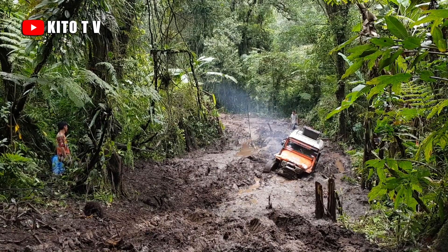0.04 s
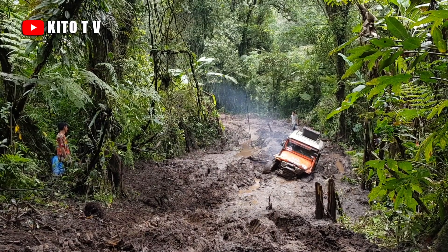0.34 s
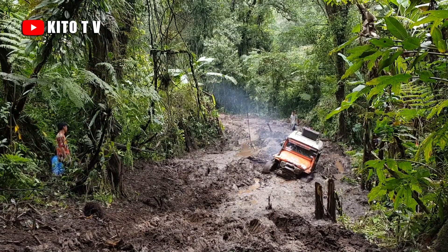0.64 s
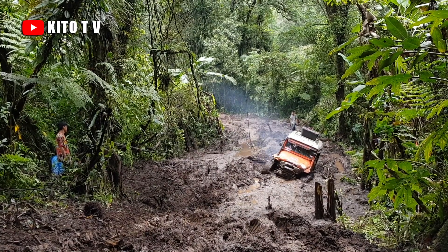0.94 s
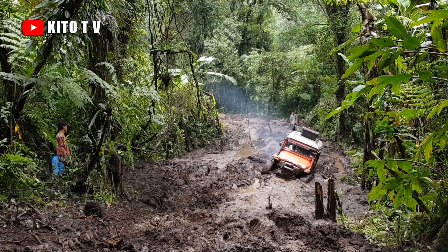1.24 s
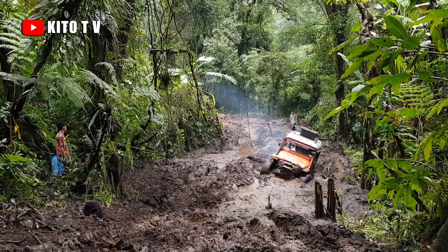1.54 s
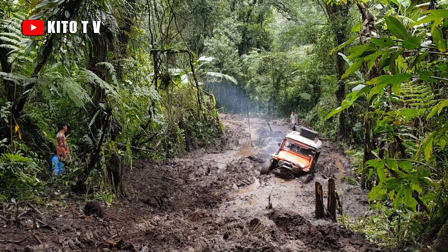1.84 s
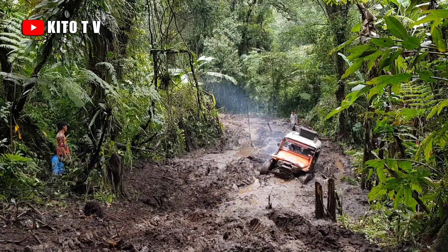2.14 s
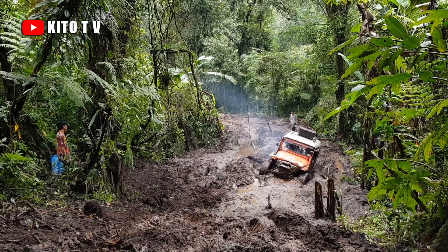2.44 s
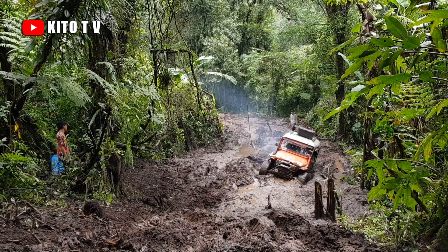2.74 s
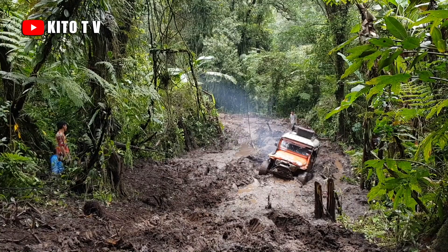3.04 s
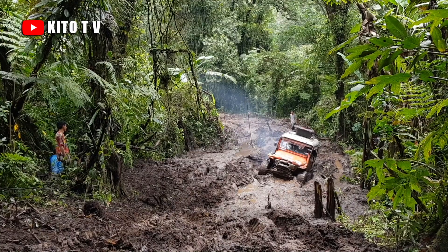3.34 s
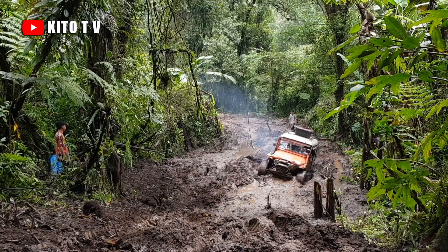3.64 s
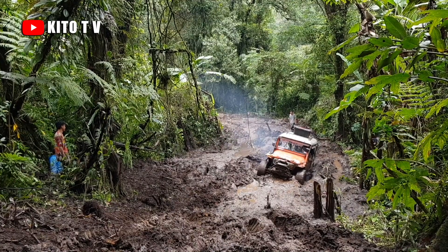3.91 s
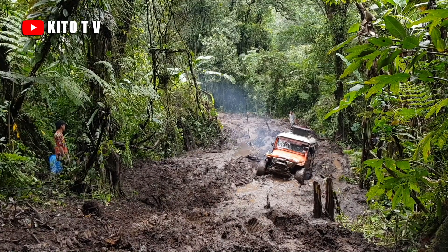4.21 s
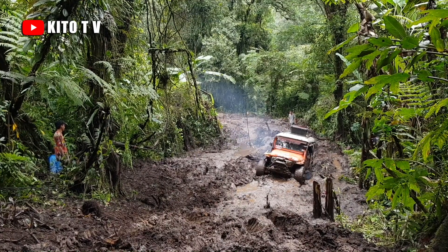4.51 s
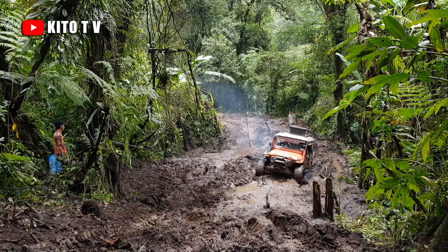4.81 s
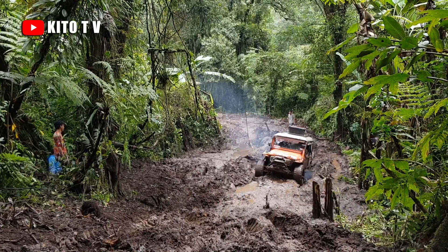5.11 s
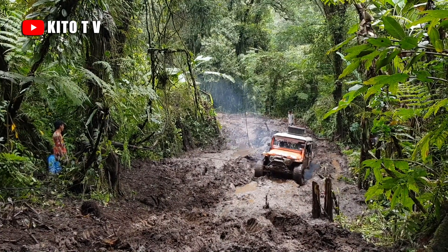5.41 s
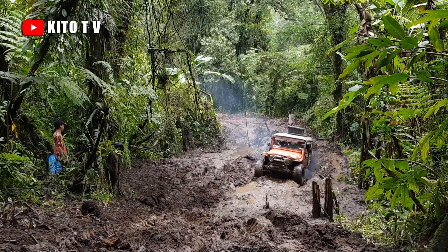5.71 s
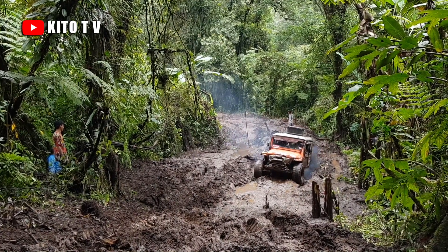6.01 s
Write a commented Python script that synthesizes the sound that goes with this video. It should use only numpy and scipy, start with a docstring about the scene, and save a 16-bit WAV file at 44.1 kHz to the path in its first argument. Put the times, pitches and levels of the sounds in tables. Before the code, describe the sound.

A four-cylinder diesel four-wheel-drive climbs a muddy forest track about twenty metres away. For the first second or so the engine holds high revs, with a whirr of fan and gears above a low exhaust drone. Wet mud spatters faintly throughout. From about 2 seconds the revs sag under load, the whirr fades and the exhaust booms and throbs, slowing to its lowest pitch around 4.5 seconds. From about 3.4 seconds loose body panels buzz in short bursts, growing stronger toward the end. From 4.4 seconds the chassis gives irregular, sharp metal clunks and clinks. Near 5 seconds the throttle opens and the revs climb again, with hard diesel knocking and a light rush of air, still pulling at just past 6 seconds. The trees scatter the sound and add a short reverberant tail.

```python
"""A four-cylinder diesel four-wheel-drive climbs a muddy forest track, some twenty metres off.
At first fan and timing gear whirr at high revs, wet mud spatters, and the trees scatter the engine's sound.
From about 2 s the tyres dig in: the revs sag and the exhaust booms on the standing waves of its pipe.
After 3 s loose bodywork buzzes, driven by the firings; from 4.4 s the chassis clunks in the ruts.
Near 5 s the throttle opens and the engine pulls through with hard combustion knock."""
import sys
import numpy as np
from scipy import signal
from scipy.fft import rfft, irfft
from scipy.io import wavfile

SR = 44100
rng = np.random.default_rng(int(sys.argv[2]) if len(sys.argv) > 2 else 0)


def transcribe(u):
    """Save the signal u as a 16-bit wav file named by the first command-line argument.

    u: samples, shape (n,) or (channels, n), limited to [-1, 1]; the rate is SR.
    q: integer samples, one column per channel.
    """
    v = np.clip(np.atleast_2d(u).T, -1, 1)
    q = np.round(v * 32767).astype(np.int16)
    wavfile.write(sys.argv[1], SR, q)


N = 275788
T = np.arange(N) / SR
FREQS = np.maximum(np.fft.rfftfreq(N, 1 / SR), 1)
CYLINDERS = 4

def undb(db):
    """Amplitude ratio of a level in decibels."""
    return 10 ** (np.asarray(db) / 20)

def unit(x):
    """Normalisation to rms 1."""
    return x / np.sqrt(np.mean(x ** 2))

def curves(rows):
    """Linear interpolation of each column in time."""
    s, *columns = np.transpose(rows)
    return [np.interp(T, s, c) for c in columns]

def spectra(rows):
    """Linear interpolation of each column in log frequency."""
    hz, *columns = np.transpose(rows)
    return [np.interp(np.log(FREQS), np.log(hz), c) for c in columns]

def lifts(modes):
    """Resonance: a bell-shaped gain in dB for each mode."""
    return sum(db / (1 + (2 * (FREQS - hz) / width) ** 2) for hz, width, db in modes)

def shape(x, gain):
    """Linear filtering by a frequency response."""
    return irfft(rfft(x) * gain, N)

def walk(rate_hz):
    """Random modulation: low-pass noise of rms 1."""
    return unit(shape(rng.standard_normal(N), np.exp(-(FREQS / rate_hz) ** 2)))

def hum(hz, width_hz):
    """Quadrature modulation: narrow-band noise about a moving frequency."""
    phase = 2 * np.pi * np.cumsum(hz) / SR
    return (walk(width_hz) * np.cos(phase) + walk(width_hz) * np.sin(phase)) / np.sqrt(2)

def place(x, pan_db):
    """Interaural level difference, left minus right."""
    return x * undb(np.array([[pan_db], [-pan_db]]) / 2)

# engine speed (time [s], firing rate [Hz])
FIRING_RATE = [(0.0, 78.74), (0.6, 78.35), (0.85, 77.59), (1.3, 78.74), (2.2, 71.58), (2.4, 69.21),
               (3.05, 63.05), (4.25, 49.83), (4.6, 48.99), (5.05, 50.79), (5.5, 54.9), (6.25, 67.64)]
# engine effort (time [s], load [0-1])
ENGINE_LOAD = [(0, 0.2), (1.2, 0.24), (1.8, 0.57), (2.3, 0.65), (2.7, 0.8), (3.3, 1), (4.7, 0.91),
               (5.6, 0.99), (6.25, 0.66)]
def crankshaft():
    """Phase is the integral of frequency: the jittered rate accumulates to a firing count."""
    hz, = curves(FIRING_RATE)
    load, = curves(ENGINE_LOAD)
    firings = np.cumsum(hz * (1 + .002 * walk(15))) / SR
    return hz, firings, load

# exhaust pipe modes (frequency [Hz], bandwidth [Hz], gain [dB])
PIPE_MODES = [(112.4, 25.4, 19.5), (185.6, 14.7, 13.5), (236.4, 28, 20), (367, 28, -49), (540, 67, -47.5)]
def pipe(hz):
    """Modal superposition gives the exhaust pipe's complex response."""
    return sum(undb(db) / (1 + 1j * (hz / f - f / hz) * f / width) for f, width, db in PIPE_MODES)

# peaks and dips of the exhaust (frequency [Hz], level [dB])
STANDING_WAVES = [(51, -23), (66, -27.5), (78, -27), (104, -10), (121, -11), (148, -16), (161, -29),
                  (171, -16.5), (198, -19.5), (209, -30), (223, -22.5), (270, -26), (292, -38), (325, -41),
                  (348, -46.5), (385, -41.5), (546, -56)]
# exhaust timbre (time [s], second harmonic gain [dB], higher harmonic gain [dB])
TIMBRE = [(0.0, 4, 0.7), (1.2, -5.5, -0.5), (1.9, 2, -1.8), (2.25, -0.1, 2), (2.65, 1.9, 5), (3.3, -1, 4),
          (4.1, 1.4, -1.2), (4.6, 1.2, -3.5), (5.3, 1, 0.9), (5.85, 2, -2.9), (6.25, -2.5, -1.4)]
def partial(k, hz, firings, gain_db):
    """Standing waves: a tone at k times the firing rate swells and dips as it slides across them."""
    second_db, overtone_db = curves(TIMBRE)
    wave_hz, wave_db = np.transpose(STANDING_WAVES)
    boom_db = np.interp(np.log(k * hz), np.log(wave_hz), wave_db)
    colour_db = second_db * max(1 - abs(k - 2), 0) + overtone_db * np.clip(k - 2, 0, 1)
    phase = 2 * np.pi * k * firings + np.angle(pipe(k * hz)) - k * np.pi / 2
    return undb(gain_db + boom_db + colour_db) * np.cos(phase)

def exhaust(hz, firings, load):
    """Periodic pulses form a harmonic series; the engine stumbles when light and steadies under load."""
    flutter_db = .3 + (1 - load)
    return sum(partial(k, hz, firings, flutter_db * np.sqrt(k / 2) * walk(10)) for k in range(1, 9))

# lines 1/4, 1/2 and 3/4 of the way between harmonics, at 216 Hz (unloaded gain [dB], loaded gain [dB])
INTERHARMONICS = [(-12.5, -10.5), (-19.5, -14.5), (-22, -11.5)]
def lope(hz, firings, load, flutter_db=1.5):
    """Unequal cylinders repeat every fourth firing, so weaker lines lie between the harmonics."""
    db_per_octave = 9.5 - 6.5 * load
    out = np.zeros(N)
    for k in range(1, 7):
        for step, (light_db, loaded_db) in enumerate(INTERHARMONICS, 1):
            multiple = k + step / CYLINDERS
            # unequal manifold branches shift the pulses, inverting the line just under each harmonic
            sign = -1 if step == len(INTERHARMONICS) else 1
            db = light_db + load * (loaded_db - light_db) + db_per_octave * np.log2(multiple * hz / 216)
            out += sign * partial(multiple, hz, firings, db + flutter_db * walk(10))
    return out

def gas(hz, firings, load):
    """Turbulence: a puff follows each firing down the pipe, stronger with load and speed."""
    puffs = rng.standard_normal(N) * np.exp(-(firings % 1) / .35)
    flow = undb(-39 + 6 * load) * (hz / hz.mean()) ** 2.5
    return unit(shape(puffs, pipe(FREQS) / (1 + (45 / FREQS) ** 4))) * flow

def bank(x, delay_s=.02085, db=-21):
    """Reflection: a mud bank returns the boom from the side."""
    return undb(db) * np.interp(T - delay_s, T, x, left=0) * np.array([[1], [-1]])

# strength of each cylinder in firing order (level [dB])
BLOW_DB = [-5.5, -10.5, -6.5, -3.5]
def blows(firings, hz, decay_s, scatter_db, rest, rise_s=.0012):
    """Impact and exponential decay: an envelope of one uneven blow per firing, above a steady floor."""
    count = np.maximum(firings, 0).astype(int)
    age = firings % 1 / hz
    size_db = np.array(BLOW_DB)[count % CYLINDERS] + scatter_db * rng.uniform(-1, 1, size=1000)[count]
    return rest + undb(size_db) * np.exp(-age / decay_s) * (1 - np.exp(-age / rise_s))

def clatter(firings, repeat, points=3300):
    """Cyclostationary noise, two rows: a share of the power repeats with every four-stroke cycle."""
    position = firings / CYLINDERS % 1 * points
    patterns = rng.standard_normal((2, points))
    periodic = np.array([unit(np.interp(position, np.arange(points), row)) for row in patterns])
    return np.sqrt(repeat) * periodic + np.sqrt(1 - repeat) * rng.standard_normal((2, N))

# stereo image (frequency [Hz], coherence [0-1], left minus right [dB])
STEREO_IMAGE = [(200, 1, 6), (400, 0.34, -2), (690, 0.71, -1), (1270, 0.41, -5), (2210, 1, -7.5),
                (3100, 0.86, 0.5), (4300, 0, -6), (6600, 0.13, -10.5), (8600, 0.1, -0.5), (15000, 0.2, -3)]
def radiate(pair, colour_db, lag_s=64e-6, low_hz=60):
    """Scattering by foliage lowers the treble's coherence between the ears; the result has rms 1."""
    coherence, pan_db = spectra(STEREO_IMAGE)
    low_cut = 1 / (1 + (low_hz / FREQS) ** 2)
    mid, side = rfft(pair) * undb(colour_db) * low_cut * np.sqrt([1 + coherence, 1 - coherence])
    left = (mid + side) * undb(pan_db / 2) * np.exp(-2j * np.pi * FREQS * lag_s)
    right = (mid - side) * undb(-pan_db / 2)
    return unit(irfft([left, right], N))

# fan and timing gear noise (frequency [Hz], relative level [dB])
WHIRR_SPECTRUM = [(200, 9.5), (350, -6.5), (600, -4.5), (1100, -3.5), (1450, -7.5), (1720, -10.5),
                  (2100, 0.5), (2500, -10), (3100, -9.5), (4200, -12), (6000, -16.5), (8000, -26),
                  (12000, -18.5), (15500, -31)]
# panel modes (frequency [Hz], bandwidth [Hz], gain [dB])
PANEL_MODES = [(1420, 45, 10.5), (1474, 42, 7), (1970, 130, 1), (2390, 46, 2.5), (2710, 97, 6.5)]
def whirr(hz, firings, load):
    """Rotational noise of fan and gears, pulsed by the valves, falls steeply as the revs sag."""
    valves = blows(2 * firings, 2 * hz, decay_s=.0018, scatter_db=2, rest=.93)
    colour_db = spectra(WHIRR_SPECTRUM)[0] + lifts(PANEL_MODES)
    db = -29 + 23.5 * np.log2(hz / hz.max()) + 1.5 * load + .24 * walk(3.4)
    return undb(db) * radiate(valves * clatter(firings, repeat=.6), colour_db)

# timing gear tones (frequency [multiples of the firing rate], level at top speed [dB])
MESH_TONES = [(16, -45.5), (17, -52), (18.6, -45), (20, -46), (27, -49), (29.15, -43), (32, -48.5)]
def gears(hz):
    """Tooth meshing: whines keep step with the crankshaft and fade as it slows."""
    whine = sum(undb(db) * hum(multiple * hz, width_hz=25) for multiple, db in MESH_TONES)
    return place(whine * (hz / hz.max()) ** 1.8, pan_db=-6.5)

# engine block modes (frequency [Hz], bandwidth [Hz], gain [dB])
BLOCK_MODES = [(740, 116, 4.6), (858, 26, 8.1), (955, 11, 0.91), (1660, 48, 1.9), (1960, 53, 2.8),
               (2130, 48, 1.4), (2677, 370, 8.9), (3300, 110, 6.6)]
def block(force, spectrum):
    """Structural radiation: the block's modes colour the force that strikes it."""
    return radiate(force, spectra(spectrum)[0] + lifts(BLOCK_MODES))

# piston noise (frequency [Hz], relative level [dB])
RATTLE_SPECTRUM = [(200, -20), (400, -1), (650, 0.5), (830, 0.5), (1100, 4.5), (1380, -1.5), (1850, -1.5),
                   (2300, -8), (3200, -8), (4200, -6), (6000, -12), (8000, -22), (12000, -15), (15500, -24)]
def rattle(hz, firings, load, approach_db_per_s=1):
    """Impact excitation: pistons rattle the block, louder with load, speed and nearness."""
    pistons = blows(firings - .041, hz, decay_s=.005, scatter_db=4, rest=1.8)
    db = -38 + approach_db_per_s * T + 3.5 * load + 5 * np.log2(hz / hz.max()) + .24 * walk(18)
    return undb(db) * block(pistons * clatter(firings, repeat=.24), RATTLE_SPECTRUM)

# wet impacts (frequency [Hz], relative level [dB])
SPLAT_SPECTRUM = [(300, -9), (1200, 17), (5000, -19), (8000, -20), (15000, -17)]
def mud(clods_per_s=250, spread_db=3, decay_s=.0035, db=-53):
    """A Poisson process: clods thrown by the tyres land at random on the track."""
    sizes = undb(spread_db * np.minimum(rng.exponential(size=N), 4))
    clods = (rng.random(N) < clods_per_s / SR) * sizes
    envelope = signal.lfilter([1], [1, -np.exp(-1 / (decay_s * SR))], clods)
    return undb(db) * radiate(envelope * rng.standard_normal((2, N)), spectra(SPLAT_SPECTRUM)[0])

def forest(x, t60_s=.5, db=-13):
    """Diffuse reverberation: trunks and banks return a short tail, different on each side."""
    tail = rng.standard_normal((2, N)) * np.exp(-np.log(1000) * T / t60_s) * (T > .012)
    tail /= np.sqrt(np.sum(tail ** 2, axis=1, keepdims=True))
    scattered = shape(x, FREQS ** 2 / (FREQS ** 2 + 190 ** 2))  # long waves pass the trunks unscattered
    return undb(db) * signal.fftconvolve(scattered[None], tail, axes=1)[:, :N]

# upper tailpipe modes (frequency [Hz], half-width at -6 dB [Hz], gain [dB])
RASP_MODES = [(365, 40, -1.5), (499, 65, -4)]
def rasp(hz, firings, load):
    """Flow excitation: fast gas under load drives the tailpipe's upper resonances."""
    puffs = clatter(firings, repeat=.85)[0] * np.exp(-(firings % 1) / .4)
    response = sum(undb(db) / (1 + 1j * (FREQS / f - f / FREQS) * f / width / 2) ** 2
                   for f, width, db in RASP_MODES)
    return unit(shape(puffs, response)) * undb(-35) * load ** 2 * (hz / hz.mean()) ** 4.1

# ringing block modes (frequency [Hz], width [Hz], level [dB])
SINGING_MODES = [(1850, 150, -43.5), (2707, 60, -44.5)]
def singing(hz, firings, load):
    """Sustained resonance: under load the firings keep the block ringing."""
    strikes = unit(blows(firings - .054, hz, decay_s=.006, scatter_db=2, rest=.4))
    rings = sum(undb(db) * hum(np.full(N, f), width) for f, width, db in SINGING_MODES)
    return place(rings * strikes * load ** 2 * (hz / hz.mean()) ** 2.2, pan_db=-2)

# panel buzzes (start [s], duration [s], frequency [Hz], level [dB])
BUZZ_BURSTS = [(3.357, 0.2, 840, -36), (3.973, 0.17, 1016, -33.5), (4.201, 0.25, 802, -35),
               (4.448, 0.4, 770, -32.5), (5.198, .4, 948, -34), (5.57, 0.29, 951.3, -27),
               (5.801, 0.58, 890, -29)]
def bodywork(hz, firings, overtone_ratio=2.06, width_hz=65):
    """Forced vibration: each firing strikes a loose panel, which buzzes in bursts as the body twists."""
    strikes = unit(blows(firings - .06, hz, decay_s=.0087, scatter_db=2, rest=.15))
    ring_hz, = curves([(s + length / 2, pitch) for s, length, pitch, _ in BUZZ_BURSTS])
    swell = sum(undb(db) * np.sin(np.pi * np.clip((T - s) / length, 0, 1))
                for s, length, _, db in BUZZ_BURSTS)
    ring = hum(ring_hz, width_hz) + undb(-6) * hum(overtone_ratio * ring_hz, width_hz)
    return place(ring * strikes * swell, pan_db=-3.5)

# chassis impacts (time [s], frequency [Hz], level [dB])
IMPACTS = [(4.449, 780, -24.5), (4.54, 1620, -34), (4.595, 1611, -31), (4.933, 2100, -24),
           (5.073, 1620, -25), (5.131, 1900, -24), (5.431, 2020, -23), (5.991, 1900, -25),
           (6.13, 1850, -23), (6.195, 1780, -23)]
def chassis(rise_s=.0012, decay_s=.013):
    """Damped free vibration: loose steel parts clink and chatter as the axles drop into ruts."""
    out = np.zeros(N)
    for s, hz, db in IMPACTS:
        age = np.maximum(T - s, 0)
        band = 1 / (1 + ((FREQS / hz - 1) / .2) ** 2)
        chatter = unit(shape(rng.standard_normal(N), band))
        ring = np.sin(2 * np.pi * hz * age) + .6 * chatter
        out += undb(db) * ring * (1 - np.exp(-age / rise_s)) * np.exp(-age / decay_s)
    return place(out, pan_db=-4)

# knock as the throttle opens (time [s], level [dB])
KNOCK_LEVEL = [(0, -59), (2.8, -40.5), (3.4, -38.5), (4.85, -36.5), (5.2, -25.5), (5.9, -23.5),
               (6.25, -21.5)]
# combustion noise (frequency [Hz], relative level [dB])
KNOCK_SPECTRUM = [(200, 10), (380, 2), (600, -3), (900, -1), (1400, -4), (1900, -3), (2400, -9),
                  (3200, -17.5), (4200, -18), (6000, -23), (8000, -22.5), (15500, -30)]
# intake noise (frequency [Hz], relative level [dB])
INTAKE_SPECTRUM = [(1000, 2), (3200, -4), (4500, -5.5), (6200, -5), (8000, -17.5), (12000, -5),
                   (15500, -31)]
def combustion(hz, firings):
    """Impulsive excitation: under full fuel every firing cracks in the block while the intake rushes."""
    cracks = blows(firings - .041, hz, decay_s=.0042, scatter_db=2.5, rest=.08)
    knock = block(cracks * clatter(firings, repeat=.23), KNOCK_SPECTRUM)
    rush = radiate(rng.standard_normal((2, N)), spectra(INTAKE_SPECTRUM)[0])
    return (knock + undb(-11) * rush) * undb(curves(KNOCK_LEVEL)[0])

def scene():
    """Superposition: one crankshaft drives exhaust, engine and bodywork; mud and echoes add to them."""
    hz, firings, load = crankshaft()
    boom = exhaust(hz, firings, load) + lope(hz, firings, load)
    tailpipe = gas(hz, firings, load) + rasp(hz, firings, load) - boom
    metal = whirr(hz, firings, load) + gears(hz) + rattle(hz, firings, load)
    metal += singing(hz, firings, load) + bodywork(hz, firings) + chassis() + combustion(hz, firings)
    # the tailpipe sits low over the mud, so less of it reaches the trees
    trees = forest(metal.mean(axis=0) + tailpipe / 2)
    return tailpipe + bank(tailpipe) + metal + mud() + trees

# microphone port modes (frequency [Hz], bandwidth [Hz], gain [dB])
PORT_MODES = [(3990, 104, 5), (5140, 530, 0), (5970, 270, -1), (11800, 3400, -2)]
def record(dry, top_hz=15750):
    """Port resonance colours the treble at the microphone; a steep low-pass cuts the top."""
    low_pass = signal.ellip(10, .2, 80, top_hz, fs=SR, output="sos")
    return signal.sosfilt(low_pass, shape(dry, undb(lifts(PORT_MODES))))


dry = scene()
out = record(dry)
transcribe(out)
```